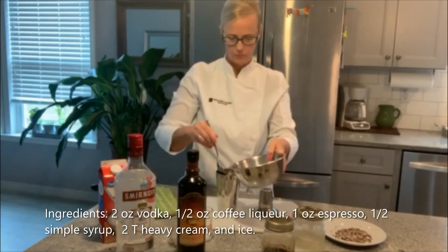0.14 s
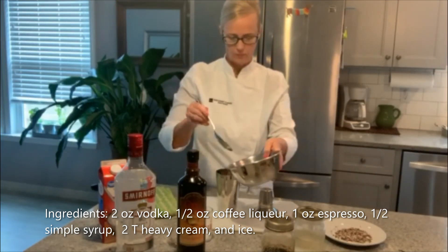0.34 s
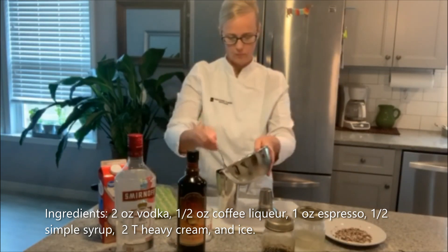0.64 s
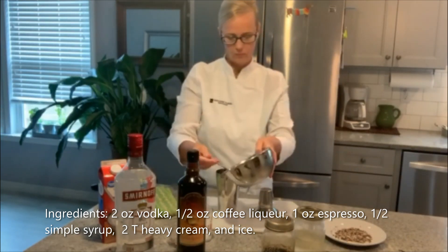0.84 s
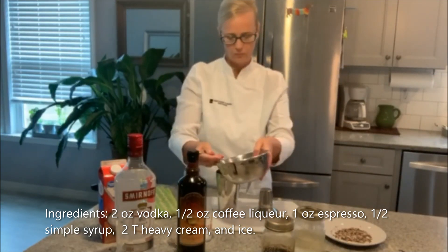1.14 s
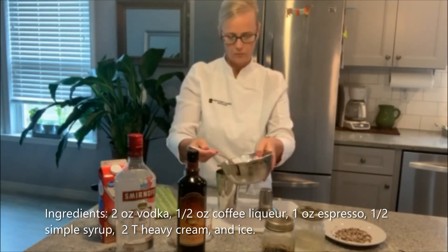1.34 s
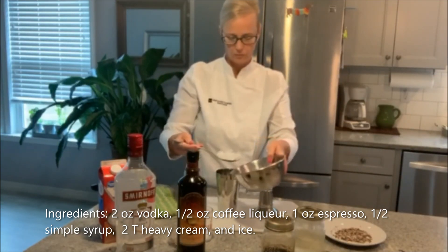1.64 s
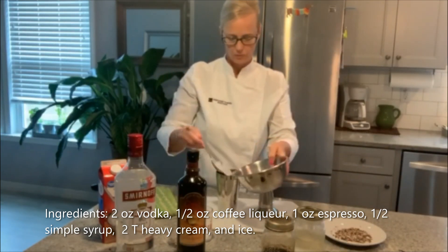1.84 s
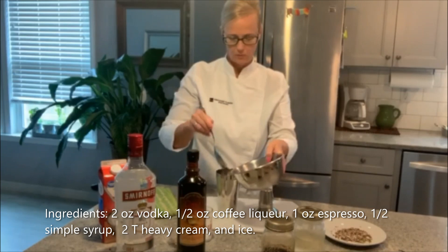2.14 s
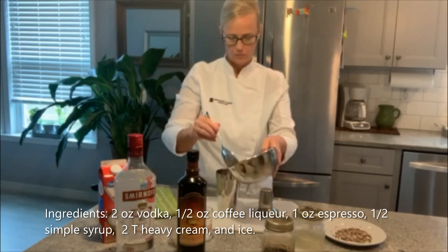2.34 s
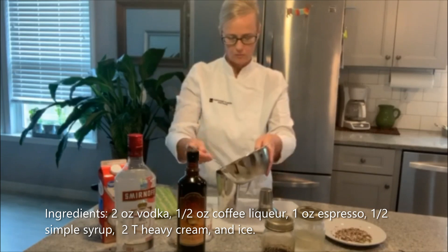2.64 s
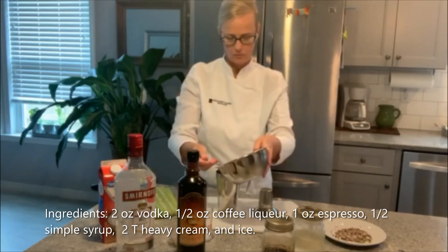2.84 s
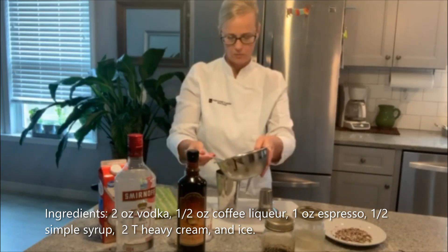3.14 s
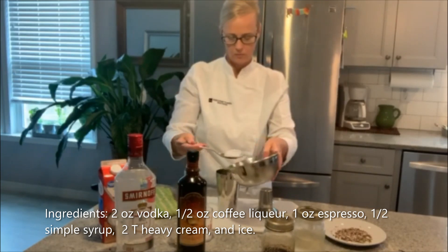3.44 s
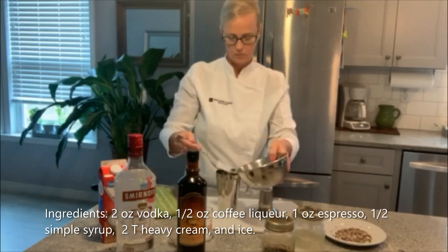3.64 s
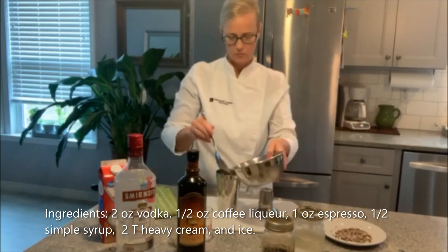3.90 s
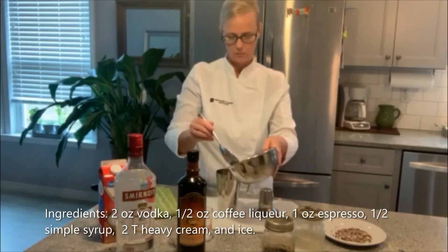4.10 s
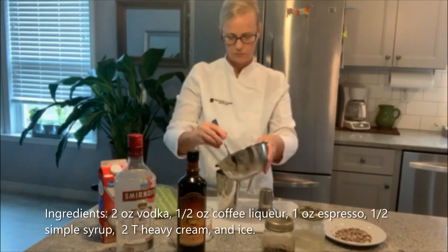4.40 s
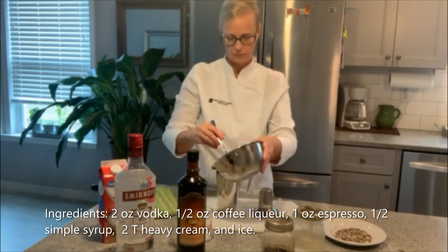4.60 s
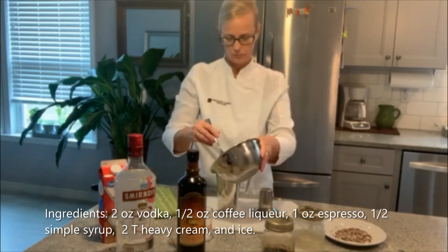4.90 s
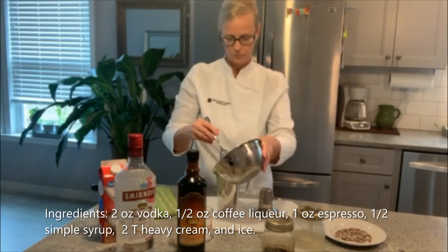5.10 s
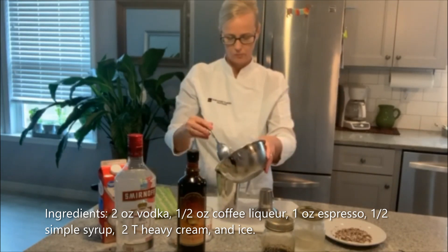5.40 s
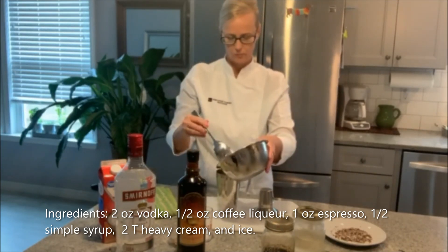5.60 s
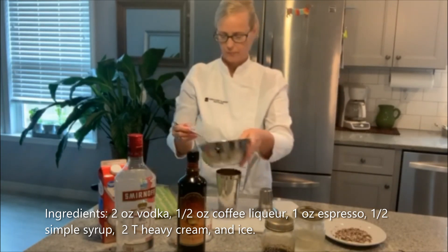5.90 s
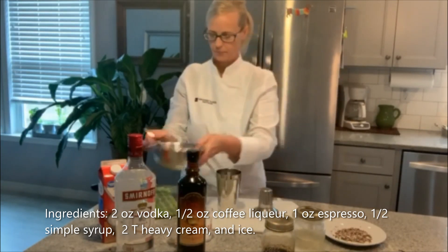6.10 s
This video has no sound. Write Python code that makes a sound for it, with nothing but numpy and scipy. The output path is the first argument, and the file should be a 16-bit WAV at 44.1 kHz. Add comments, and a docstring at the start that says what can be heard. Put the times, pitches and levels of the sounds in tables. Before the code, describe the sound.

In a slightly reverberant kitchen, a few steps from the microphone, a spoon scoops ice from a steel bowl into a metal cocktail shaker. Three loads tumble in, the first ringing brightly and the last landing on ice with a duller clatter. Between them, cubes slide and clack around the bowl. Light spoon ticks and scrapes follow, then a short bowl clang and a last rattle. An appliance hums softly throughout.

```python
"""Ice cubes spooned from a hand-held steel bowl into a steel cocktail shaker, in a live kitchen.
The spoon digs in; cubes grind round the bowl (random slips through resonances), clack and knock.
They tumble into the shaker, whose modal ring drops and shortens as it fills.
At the end the bowl is knocked and a grip chokes its ring. An appliance hums underneath."""
import sys
import numpy as np
from scipy import signal
from scipy.fft import rfft, irfft, next_fast_len
from scipy.io import wavfile
from scipy.ndimage import uniform_filter1d

SR = 44100
rng = np.random.default_rng(int(sys.argv[2]) if len(sys.argv) > 2 else 0)


def to_wav(sig):
    """Store sig (one row per channel, or 1-D mono) as 16-bit WAV at the path in sys.argv[1].

    Samples outside -1..1 are clipped; the rate is SR.
    """
    pcm = np.clip(np.atleast_2d(sig), -1, 1) * 32767
    pcm = np.round(pcm).astype(np.int16)
    wavfile.write(sys.argv[1], SR, pcm.T)  # frames by channels


N = 275668
TIME_S = np.arange(N) / SR

# Table levels are relative: each source adds its own trim.
# cubes set sliding by spoon or tilt: start_s, swell_s, fade_s, thud_db, clack_re_thud_db, crack_re_thud_db
SLIDES = [(0.0, 0.0038, 0.12, -44.5, 2, 11.5), (0.082, 0.012, 0.065, -35, 8.5, -18),
          (0.55, 0.14, 0.23, -45, 1, 1), (0.72, 0.32, 0.29, -39.5, 0.5, -3.5),
          (1.951, 0.036, 0.23, -40, 7, -1.5), (2.441, 0.084, 0.3, -41, 0, -2),
          (2.68, 0.053, 0.59, -48.5, 1.5, -5), (3.156, 0.15, 0.12, -41.5, -5.5, -2.5),
          (3.42, 0.37, 0.34, -55, -13.5, -17.5), (3.82, 0.035, 0.056, -48, 11.5, 5),
          (4.298, 0.086, 0.41, -44, -7.5, -3.5), (4.78, 0.34, 0.13, -52.5, -2, 1),
          (5.225, 0.0065, 0.27, -53.5, 6, -4), (5.4, 0.1, 0.1, -53, 0.5, 0),
          (5.85, 0.022, 0.5, -57.5, -9, -7.5), (6.015, 0.029, 0.21, -36.5, -2, -2),
          (6.15, 0.012, 0.092, -35, 1.5, 3.5)]
# hard contacts of ice and spoon: start_s, clack_db, thud_db, crack_db, settle_s
ICE_CONTACTS = [(0.044, -33, -42, -45, 0.016), (0.0945, -29.5, -45, -31.5, 0.016),
                (0.1024, -21.5, -36, -47, 0.0038), (0.1634, -33.5, -31.5, -57, 0.016),
                (0.517, -23.5, -35, -34.5, 0.0049), (0.5394, -29.5, -42, -43, 0.014),
                (0.6084, -28.5, -38.5, -54, 0.0018), (0.8101, -46, -36, -69, 0.011),
                (1.4113, -48, -43, -35, 0.0066), (1.4207, -45, -37.5, -35, 0.032),
                (1.4504, -42.5, -39.5, -37.5, 0.016), (1.914, -30, -42, -54, 0.047),
                (2.011, -28, -51, -40, 0.018), (2.275, -42, -41, -72, 0.008),
                (2.3981, -29, -38, -37, 0.019), (2.4039, -26.5, -34.5, -32, 0.013),
                (2.4736, -31, -30.5, -36, 0.011), (2.5646, -24, -48, -37.5, 0.05),
                (2.8958, -40, -37, -47, 0.029), (3.0118, -46, -33.5, -55, 0.0025),
                (3.22, -54, -50, -37, 0.014), (3.2846, -57, -37, -32.5, 0.008),
                (3.81, -35.5, -41, -44, 0.0078), (3.8313, -29.5, -35.5, -31.5, 0.0042),
                (4.2901, -41, -37, -40.5, 0.0087), (4.385, -55, -36, -61, 0.0052),
                (4.4716, -39.5, -44, -43.5, 0.011), (4.5876, -35.5, -43, -43.5, 0.0078),
                (4.9462, -62, -51, -46.5, 0.0054), (4.978, -43, -53, -57, 0.015),
                (5.0514, -37.5, -39, -53, 0.0046), (5.0815, -35, -43.5, -65, 0.011),
                (5.1253, -45, -45, -50, 0.0036), (5.1859, -43, -41.5, -57, 0.0037),
                (5.2375, -30.5, -36, -68, 0.004), (5.557, -32, -39.5, -51.5, 0.01),
                (5.6345, -34, -51, -76, 0.012), (6.039, -42, -47, -43, 0.027),
                (6.166, -35.5, -30, -33, 0.014)]
# blows on the shaker wall: start_s, level_db, fill_ratio, cutoff_hz
SHAKER_BLOWS = [(0.0, -25.5, 0.0, 12000), (0.048, -24.5, 0.02, 8040), (0.057, -22, 0.03, 5500),
                (0.101, -45, 0.2, 9000), (0.164, -35, 0.06, 9000), (1.914, -29, 0.46, 6950),
                (1.962, -21, 0.49, 6500), (1.972, -20.5, 0.5, 6500), (2.011, -23.5, 0.6, 6500),
                (2.074, -21, 0.66, 3200), (3.831, -31.5, 1.0, 4000), (3.869, -33.5, 1, 4000),
                (3.925, -39, 0.97, 4000)]
# ice coming to rest on the shaker wall: start_s
SHAKER_CHOKES = [0.073, 2.1, 3.98]
# single cubes on the bowl wall: start_s, level_db, pitch_hz
WALL_KNOCKS = [(0.0864, -24, 2060), (0.094, -22, 1830), (0.1074, -24, 1290), (0.1247, -27, 1240),
               (0.643, -32, 1750), (0.756, -35, 1660), (0.814, -41, 1190), (0.845, -24, 1660),
               (0.8999, -26, 1850), (0.9279, -28, 1580), (0.9675, -31, 1860), (0.9871, -19, 1460),
               (1.036, -21, 1560), (1.0454, -27, 1650), (1.0724, -27.5, 1320), (1.0914, -32, 1240),
               (1.1542, -30, 1660), (1.218, -37, 1560), (2.526, -40, 1650), (2.6052, -37, 1760),
               (2.6733, -30, 1770), (3.0112, -29, 1600), (3.0384, -41, 1720), (3.251, -28.5, 1680),
               (4.3844, -45, 1530), (4.408, -36, 1530), (4.4202, -32.5, 1560), (6.134, -32, 1800),
               (6.1644, -29, 1370)]
# blows on the bowl: start_s, level_db, cutoff_hz, pitch_ratio
BOWL_BLOWS = [(1.155, -36.5, 1250, 0.92), (3.305, -39.5, 890, 0.74), (4.39, -42, 895, 1.04),
              (5.052, -50, 1000, 0.895), (5.226, -42.5, 900, 0.91), (5.473, -51, 900, 0.86),
              (5.854, -43, 850, 0.94), (5.95, -43, 840, 0.98), (6.024, -15, 724, 1.005),
              (6.039, -27, 2900, 1), (6.056, -28.5, 3200, 1), (6.089, -30, 1600, 1), (6.165, -31, 5500, 1),
              (6.175, -32, 6000, 1), (6.223, -35, 4000, 1)]
# blows on rim and spoon: start_s, level_db, cutoff_hz
RIM_BLOWS = [(2.143, -28.5, 1700), (2.225, -26, 2040)]
SPOON_BLOWS = [(2.400, -25.5, 14000), (3.012, -36.5, 5900)]
# damped impacts: start_s, level_db
FLOOR_LANDINGS = [(0.087, -29), (0.112, -30.5), (0.164, -30), (0.193, -35), (0.213, -41.5), (0.352, -41.5),
                  (1.968, -31)]
HEAP_SHOVES = [(0.519, -38), (0.643, -37), (0.77, -40.5), (2.401, -31.5), (2.49, -36.5), (3.012, -44.5),
               (3.22, -41.5), (4.291, -36), (4.365, -43), (4.465, -31.5), (6.03, -43), (6.155, -35)]
SPOON_TICKS = [(0.6085, -36), (3.0122, -37), (3.745, -65), (4.422, -52), (4.474, -41), (4.85, -66),
               (4.979, -43), (5.052, -50), (5.126, -44.5), (5.187, -35.5), (5.408, -43), (5.418, -59),
               (5.853, -56)]
ICE_TUMBLES = [(1.971, -35), (2.02, -41), (2.085, -34), (2.118, -41), (2.15, -38), (3.8317, -28.5),
               (3.847, -40), (3.869, -32.5), (3.895, -33), (3.925, -35), (3.96, -38.5)]
# strokes through the ice: start_s, length_s, level_db
HEAP_CRUNCHES = [(0.773, 0.3, -50.5), (3.126, 0.091, -55)]
CUBE_ROLLS = [(1.04, 0.21, -46.5), (2.46, 0.22, -46), (2.6, 0.23, -52), (3.2, 0.24, -47.5),
              (4.35, 0.18, -46.5), (4.5, 0.21, -54)]
# strokes on bare steel: start_s, length_s, level_db, pitch_ratio
SPOON_SCRAPES = [(4.471, 0.12, -51, 1.23), (5.037, 0.072, -63, 0.91), (5.214, 0.092, -49.5, 0.92),
                 (5.448, 0.23, -56, 0.95)]

# shaker wall modes: empty_hz, full_drop_hz, level_db, empty_t60_s
SHAKER_MODES = [(809, 43, -12, 0.23), (2763, 563, 2, 0.29), (2817, 396, -10, 0.19), (4298, 120, -3, 0.26),
                (4340, 100, 0, 0.23), (4740, 400, -7, 0.16), (5620, 120, -6, 0.1), (6570, 280, 3, 0.17),
                (6560, 240, -8, 0.3), (7380, 220, -5, 0.12), (7700, 430, 0, 0.17), (8750, 39, -3, 0.077)]
# steel modes: pitch_hz, level_db, t60_s
BOWL_MODES = [(515.6, -17.5, 0.4), (728, -9, 0.24), (794, -10, 0.22), (903, 4.5, 0.28), (930, -12, 0.15),
              (1355, -5, 0.18), (1720, -7, 0.3), (2245, -7, 0.25), (2570, 6.5, 0.16), (3300, 3, 0.22),
              (4040, 6, 0.3), (4980, -4, 0.17), (6535, -3, .2), (7250, 1, .15), (8522, 5, .14)]
RIM_MODES = [(900, -31, 0.22), (972, -0.5, 0.14), (1080, -7, 0.13)]
SPOON_MODES = [(1200, -8.5, 0.22), (2552, -7, 0.42), (3190, -8, 0.25), (7580, -7, 0.094), (7470, -4, 0.11),
               (7800, 12, 0.026), (8250, 8.5, 0.022)]
# damped resonances: centre_hz, width_hz, level_db
THUD_BODY = [(481, 227, -5.5), (589.7, 26, 0.5), (721, 47, -1.5), (806, 32, -0.5), (923, 63, 0.5),
             (1071, 20.5, -1.5), (1214, 290, -7), (1559, 106, -5), (1736, 160, -5.5)]  # bowl loaded with ice
CLACK_BODY = [(1850, 460, -5), (2220, 530, -3), (2393, 243, 0.5), (2610, 330, -2.5), (2980, 470, -3.5),
              (3400, 400, -4.5), (3850, 330, -5), (4260, 460, -4.5), (4690, 620, -6), (6280, 1840, -7)]  # cube on steel
CRACK_BODY = [(5800, 9200, -12), (7670, 2800, -2), (8880, 370, 1), (10040, 210, 8.5), (11030, 1000, 1),
              (12600, 1400, -5), (13700, 950, -6)]  # splintering ice
WALL_BODY = [(606, 180, -10), (907, 180, -1.5), (1226, 160, -4), (1585, 150, 6), (1810, 210, 0.5),
             (1945, 250, -6.5), (2560, 370, -8), (2770, 640, -13.5)]
FLOOR_BODY = [(673, 130, -7), (762, 64, 3.5), (854, 88, -0.5), (1320, 140, -9.5)]
HEAP_BODY = [(246, 27, -6.5), (353, 23, -4.5), (483, 86, -0.5), (603, 35, -8.5)]
TICK_BODY = [(2080, 1000, 0.5), (4930, 3400, 0), (8600, 2200, 5.5), (11600, 1800, -1), (14500, 1400, -4)]
ROLL_BODY = [(700, 37, -0.36), (762, 26, -0.62), (792, 32, 0.92), (862, 24, -2.7), (911, 21, -0.99)]
TUMBLE_BODY = [(1240, 320, -9), (2510, 240, 1), (3520, 490, -4), (3790, 260, 2), (4500, 680, -5.5),
               (5900, 1100, -3), (7060, 1200, -10.5)]
SCRAPE_BODY = [(2140, 47, 3), (2670, 170, 0), (2790, 140, 1.5), (3100, 500, -9)]

# room decay: band_hz, t60_s
ROOM_DECAY = [(200, 0.96), (800, 0.81), (2000, 0.81), (4500, 0.8), (7000, 0.62), (10000, 0.46),
              (16000, 0.42)]
# left-right likeness of the diffuse field: band_hz, correlation
COHERENCE = [(60, 0.71), (250, 0.79), (700, 0.24), (1400, 0.21), (3000, 0.0013), (16000, 0.16)]
# moving air: band_hz, density_db
AIR_SPECTRUM = [(20, -37), (35, -3), (55, -1), (90, 0), (125, -4.5), (170, -5.5), (300, -6.5), (600, -24.5),
                (1000, -19.5), (2000, -41), (5000, -41), (9000, -52), (16000, -68)]


def from_db(db):
    """Decibels to gain."""
    return 10 ** (np.asarray(db) / 20)


def unit_energy(x):
    """Scale each channel to a sum of squares of one."""
    return x / np.sqrt(np.sum(x ** 2, axis=-1, keepdims=True) + 1e-20)


def at_hz(table, hz):
    """Interpolate on a log-frequency axis."""
    band_hz, values = np.array(table).T
    return np.interp(np.log(hz), np.log(band_hz), values)


def add(track, start_s, sound):
    """Mix in place at start_s."""
    start = int(np.clip(round(start_s * SR), 0, N - 1))
    track[start:start + len(sound)] += sound[:N - start]


def through(x, response):
    """Convolve, cut to N."""
    return signal.oaconvolve(x, response)[:N]


def delayed(x, lag_s):
    """Fractional delay by FFT."""
    size = next_fast_len(N + 1000)
    hz = np.arange(size // 2 + 1) * SR / size
    return irfft(rfft(x, size) * np.exp(-2j * np.pi * hz * lag_s), size)[:N]


def drift(rate_hz):
    """Piecewise-linear noise, spread near one."""
    knots_s = np.arange(0, TIME_S[-1] + 1, 1 / rate_hz)
    return np.interp(TIME_S, knots_s, rng.standard_normal(len(knots_s)))


def band_limited(body, x):
    """A body radiates little outside the span of its resonances."""
    span_hz = [0.7 * body[0][0], min(1.4 * body[-1][0], 0.45 * SR)]
    return signal.sosfilt(signal.butter(2, span_hz, "band", fs=SR, output="sos"), x)


def resonate(x, hz, width_hz):
    """Two-pole resonator, unity peak gain."""
    radius = np.exp(-np.pi * width_hz / SR)
    feedback = [1, -2 * radius * np.cos(2 * np.pi * hz / SR), radius ** 2]
    return signal.lfilter(np.array([1, 0, -1]) * (1 - radius ** 2) / 2, feedback, x)


def body_response(body, scatter_db=3.5):
    """Parallel damped resonances; strengths vary with the contact point."""
    t = np.arange(2048) / SR
    response = np.zeros(len(t))
    for k, (hz, width_hz, db) in enumerate(body):
        gain = (-1) ** k * from_db(db + scatter_db * rng.normal()) * width_hz
        response += gain * np.exp(-np.pi * width_hz * t) * np.cos(2 * np.pi * hz * t)
    return unit_energy(band_limited(body, response))


def impact(response, snap_s, chatter_db, chatter_s):
    """Snap plus uneven chatter as a cube settles; energy of 1 ms at level one."""
    t = np.arange(3000) / SR
    snap = unit_energy(rng.standard_normal(len(t)) * np.exp(-t / snap_s))
    chatter = unit_energy(rng.standard_normal(len(t)) ** 5 * np.exp(-t / chatter_s))
    force = snap + from_db(chatter_db) * chatter
    return np.sqrt(SR / 1000) * unit_energy(signal.fftconvolve(force, response))


def thumps(hits, body, snap_s):
    """Blows on a body too damped to ring."""
    out = np.zeros(N)
    for start_s, level_db in hits:
        thump = impact(body_response(body), snap_s, chatter_db=0, chatter_s=0.0016)
        add(out, start_s, from_db(level_db + 3.5) * thump)
    return out


def softened(modes, cutoff_hz, pitch_ratio=1):
    """Modes as a blow wakes them: the softer, the less treble."""
    return [(pitch_ratio * hz, db - 10 * np.log10(1 + (hz / cutoff_hz) ** 7.4), t60_s)
            for hz, db, t60_s in modes]


def struck(modes, scatter_db, pull_ratio):
    """One modal ring; the strike point sets strengths, shifting ice or fingers pull the pitch."""
    t = np.arange(SR) / SR
    knots_s = np.arange(0, 1, 0.009)
    out = np.zeros(SR)
    for hz, db, t60_s in modes:
        wander = np.interp(t, knots_s, rng.standard_normal(len(knots_s)))
        phase = 2 * np.pi * hz * np.cumsum(1 + pull_ratio * wander) / SR
        out += from_db(db + scatter_db * rng.normal() - 60 * t / t60_s) * np.sin(phase)
    return out


def choke(start_s, t60_s):
    """Gain of a ring damped from start_s on."""
    return from_db(-60 * np.clip((TIME_S - start_s) / t60_s, 0, 2))


def buzzing(ring, depth):
    """Loose cubes touch and leave a ringing wall, roughening its tone."""
    return ring * (1 + depth * drift(rate_hz=320))


def rubbing(start_s, length_s, body, slips_per_s, spread_db):
    """One stroke: a swell of uneven slips through a body."""
    swell = np.sin(np.pi * np.clip((TIME_S - start_s) / length_s, 0, 1))
    slips = (rng.random(N) < slips_per_s / SR) * rng.choice([-1, 1], N)
    strength = from_db(spread_db * np.minimum(rng.exponential(1, N), 3))
    force = swell * np.sqrt(N) * unit_energy(slips * strength)
    return through(force, body_response(body, scatter_db=2))


def diffuse_bands(size):
    """Half-octave stereo noise bands, alike in the bass, nearly unrelated in the treble."""
    edges_hz = np.geomspace(18, 18000, 21)
    white = rng.standard_normal((2, 2, size + SR // 4))
    for k, (low_hz, high_hz) in enumerate(zip(edges_hz, edges_hz[1:])):
        bandpass = signal.butter(2, [low_hz, high_hz], "band", fs=SR, output="sos")
        mid, side = signal.sosfilt(bandpass, white[k % 2])[:, -size:]
        hz = np.sqrt(low_hz * high_hz)
        alike = at_hz(COHERENCE, hz)
        yield hz, np.sqrt(1 + alike) * mid + np.sqrt(1 - alike) * side * [[1], [-1]]


def air_and_hum(air_db=-54, hum_db=-56.5, hum_hz=116.6):
    """Rumble of moving air and appliance hum, panned slightly left."""
    air = sum(from_db(at_hz(AIR_SPECTRUM, hz)) * band for hz, band in diffuse_bands(N))
    air = np.sqrt(N) * unit_energy(air)
    hum = np.sin(2 * np.pi * hum_hz * TIME_S)
    return (from_db(air_db) * air + from_db(hum_db) * hum) * from_db([[0.9], [-0.9]])


def slide_gains(rise_db=9, fall_db=19.5, dulling_db=1.5, breakaway_ratio=0.19):
    """Thud, clack and crack gains: cubes come unstuck, swell, then fade and dull as they slow."""
    gains = np.zeros((3, N))
    for start_s, swell_s, fade_s, thud_db, clack_db, crack_db in SLIDES:
        age_s = TIME_S - start_s
        shape_db = np.minimum(rise_db * (age_s / swell_s - 1), -fall_db * (age_s - swell_s) / fade_s)
        moving = np.clip(age_s / (breakaway_ratio * swell_s), 0, 1) * (age_s < swell_s + fade_s)
        slowing_db = -dulling_db * np.maximum(age_s - swell_s, 0) / fade_s
        thud = from_db(thud_db + shape_db) * moving
        gains += [thud, thud * from_db(clack_db + slowing_db), thud * from_db(crack_db + slowing_db)]
    return gains


def grinding(gains, slips_per_s=(300, 600, 1800), trims_db=(-5, -5.5, -5.5), spread_db=3.5):
    """Wet cubes slip in clumps of clicks, coarse in the bowl, fine in the ice."""
    clumps = from_db(5 * drift(rate_hz=60))
    bodies = (THUD_BODY, CLACK_BODY, CRACK_BODY)
    out = np.zeros(N)
    for gain, body, per_s, trim_db in zip(gains, bodies, slips_per_s, trims_db):
        slipping = rng.random(N) < clumps * per_s / SR
        slips = slipping * from_db(spread_db * np.minimum(rng.exponential(1, N), 3.5))
        grains = np.zeros(N)
        for hz, width_hz, db in body:
            coupling = from_db(4.5 * drift(rate_hz=22))  # resonances stand out by turns
            grains += from_db(db) * resonate(slips * coupling * rng.standard_normal(N), hz, width_hz)
        grains = band_limited(body, grains)
        running_rms = np.sqrt(np.abs(uniform_filter1d(grains ** 2, size=3000)) + 1e-9)
        out += from_db(trim_db) * gain * grains / running_rms
    return out


def jostles(gain, trim_db, bumps_per_s=11, spread_db=2):
    """Chance bumps, as hard as the slide is strong: start_s, level_db."""
    count = int(bumps_per_s * N / SR)
    starts = ((np.arange(count) + rng.random(count)) * (N - 1) / count).astype(int)
    levels_db = 20 * np.log10(gain[starts] + 1e-9) + trim_db + spread_db * rng.standard_normal(count)
    return zip(starts / SR, levels_db)


def sliding_cubes():
    """Cubes grind along the steel, knock, clack together and wake the bowl's low modes."""
    gains = slide_gains()
    thud_gain, clack_gain, _ = gains
    knocks = thumps(jostles(thud_gain, trim_db=-1.5), THUD_BODY, snap_s=0.00042)
    clacks = thumps(jostles(clack_gain, trim_db=4), CLACK_BODY, snap_s=0.00044)
    low_modes = softened(BOWL_MODES, cutoff_hz=746)
    spots = [struck(low_modes, scatter_db=5, pull_ratio=0.0087) for _ in range(4)]
    ring = np.zeros(N)
    for k, (start_s, level_db) in enumerate(jostles(thud_gain, trim_db=-4)):
        add(ring, start_s, from_db(level_db) * spots[k % len(spots)])
    return grinding(gains) + knocks + clacks + ring


def shaker_ring(ice_damping=0.7):
    """More ice on the wall: lower, shorter, less steady ring. Settling ice chokes it."""
    out = np.zeros(N)
    for start_s, level_db, fill, cutoff_hz in SHAKER_BLOWS:
        modes = [(hz - fill * drop_hz, db, t60_s / (1 + ice_damping * fill))
                 for hz, drop_hz, db, t60_s in SHAKER_MODES]
        ring = struck(softened(modes, cutoff_hz), scatter_db=1.5, pull_ratio=0.004 + 0.0025 * fill)
        blow = np.zeros(N)
        add(blow, start_s, from_db(level_db - 11.5) * ring)
        next_choke_s = min(s for s in SHAKER_CHOKES if s > start_s)
        out += blow * choke(next_choke_s, t60_s=0.07)
    return buzzing(out, depth=0.25)


def ice_contacts(snap_ratio=0.26):
    """Each contact thuds in the bowl, clacks in the cube and cracks at its surface."""
    out = np.zeros(N)
    for start_s, clack_db, thud_db, crack_db, settle_s in ICE_CONTACTS:
        snap_s = snap_ratio * settle_s
        thud = impact(body_response(THUD_BODY), snap_s, chatter_db=-4.5, chatter_s=settle_s)
        clack = impact(body_response(CLACK_BODY), snap_s, chatter_db=3.5, chatter_s=settle_s)
        crack = impact(body_response(CRACK_BODY), snap_s, chatter_db=-4, chatter_s=snap_s)
        add(out, start_s, from_db(thud_db + 2.5) * thud)
        add(out, start_s, from_db(clack_db) * clack)
        add(out, start_s, from_db(crack_db + 6) * crack)
    return out


def wall_knocks():
    """Single cubes hit the bowl wall; each spot has its own pitch."""
    out = np.zeros(N)
    strongest_hz = max(WALL_BODY, key=lambda row: row[2])[0]
    for start_s, level_db, pitch_hz in WALL_KNOCKS:
        spot = [(hz * pitch_hz / strongest_hz, width_hz, db) for hz, width_hz, db in WALL_BODY]
        knock = impact(body_response(spot, scatter_db=1), snap_s=0.0003, chatter_db=1.5, chatter_s=0.0012)
        add(out, start_s, from_db(level_db - 5) * knock)
    return out


def floor_landings():
    """Cubes hit the shaker floor: hollow clunk."""
    return thumps(FLOOR_LANDINGS, FLOOR_BODY, snap_s=0.0033)


def heap_shoves():
    """The whole heap is shoved against the bowl: dull thump."""
    return thumps(HEAP_SHOVES, HEAP_BODY, snap_s=0.002)


def spoon_ticks():
    """The spoon's edge flicks a cube: dry tick."""
    return thumps(SPOON_TICKS, TICK_BODY, snap_s=0.00031)


def heap_crunches():
    """The spoon crunches the heap against the wall."""
    return sum(from_db(level_db) * rubbing(start_s, length_s, WALL_BODY, slips_per_s=200, spread_db=2.5)
               for start_s, length_s, level_db in HEAP_CRUNCHES)


def cube_rolls():
    """Cubes roll over the bowl floor and keep it singing."""
    return sum(from_db(level_db) * rubbing(start_s, length_s, ROLL_BODY, slips_per_s=200, spread_db=1.5)
               for start_s, length_s, level_db in CUBE_ROLLS)


def bowl_ring(grip_s=6.062):
    """Struck bowl, retuned by shifting ice; the hand's grip chokes all earlier blows."""
    out = np.zeros(N)
    for start_s, level_db, cutoff_hz, pitch_ratio in BOWL_BLOWS:
        ring = struck(softened(BOWL_MODES, cutoff_hz, pitch_ratio), scatter_db=1.5, pull_ratio=0.0028)
        blow = np.zeros(N)
        add(blow, start_s, from_db(level_db - 8) * ring)
        out += blow * choke(grip_s, t60_s=0.029) if start_s < grip_s else blow
    return buzzing(out, depth=0.27)


def ice_tumbles():
    """Cubes fall on the ice in the shaker: bright clatter."""
    return thumps(ICE_TUMBLES, TUMBLE_BODY, snap_s=0.0041)


def steel_pings(blows, modes):
    """Freely ringing steel: bowl bumping the shaker rim, or the spoon's tip struck."""
    out = np.zeros(N)
    for start_s, level_db, cutoff_hz in blows:
        ring = struck(softened(modes, cutoff_hz), scatter_db=0.5, pull_ratio=0.0045)
        add(out, start_s, from_db(level_db - 7) * ring)
    return out


def spoon_scrapes():
    """The spoon's edge slips over bare steel."""
    out = np.zeros(N)
    for start_s, length_s, level_db, pitch_ratio in SPOON_SCRAPES:
        body = [(pitch_ratio * hz, width_hz, db) for hz, width_hz, db in SCRAPE_BODY]
        out += from_db(level_db) * rubbing(start_s, length_s, body, slips_per_s=370, spread_db=7)
    return out


def kitchen_response(build_s=0.0031, early_db=3, early_s=0.0084):
    """Strong early reflections off counter and cupboards, then a tail decaying by band."""
    t = np.arange(SR) / SR
    tail = sum(band * from_db(-60 * t / at_hz(ROOM_DECAY, hz)) for hz, band in diffuse_bands(SR))
    build_up = 1 - np.exp(-(t / build_s) ** 2)
    early_boost = 1 + from_db(early_db) * np.exp(-t / early_s)
    return unit_energy(tail * build_up * early_boost)


def scene(shaker_send_db=-5, steel_send_db=-5.5, left_lag_s=0.00007):
    """Ice and steel a few steps away: room as loud as the direct ice, steel drier."""
    ice = ice_contacts() + sliding_cubes() + heap_crunches() + cube_rolls() + spoon_scrapes()
    ice += heap_shoves() + wall_knocks() + spoon_ticks() + floor_landings() + ice_tumbles()
    shaker = shaker_ring()
    steel = bowl_ring() + steel_pings(SPOON_BLOWS, SPOON_MODES) + steel_pings(RIM_BLOWS, RIM_MODES)
    direct = ice + shaker + steel
    send = ice + from_db(shaker_send_db) * shaker + from_db(steel_send_db) * steel
    room = np.array([through(send, side) for side in kitchen_response()])
    return np.array([delayed(direct, left_lag_s), direct]) + room + air_and_hum()


def record(dry, crossover_hz=6500, own_db=-7, right_db=-1, right_lag_s=0.000262, cutoff_hz=16200):
    """Above the crossover the right channel is mostly the left, delayed; the very top is cut."""
    lowpass = signal.butter(4, crossover_hz, "low", fs=SR, output="sos")
    highpass = signal.butter(4, crossover_hz, "high", fs=SR, output="sos")
    lows = signal.sosfilt(lowpass, signal.sosfilt(lowpass, dry))
    top_left, top_right = signal.sosfilt(highpass, signal.sosfilt(highpass, dry))
    top_right = from_db(right_db) * (delayed(top_left, right_lag_s) + from_db(own_db) * top_right)
    top_cut = signal.ellip(10, 0.1, 70, cutoff_hz, fs=SR, output="sos")
    return signal.sosfilt(top_cut, lows + np.array([top_left, top_right]))


dry = scene()
out = record(dry)
to_wav(out)
```